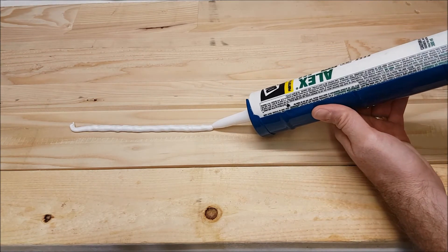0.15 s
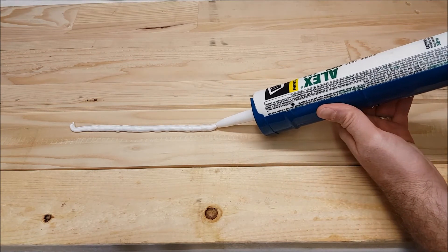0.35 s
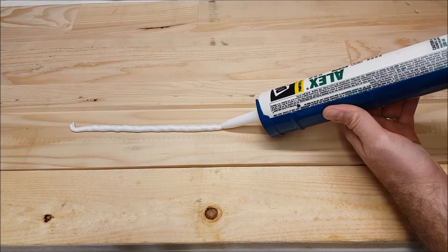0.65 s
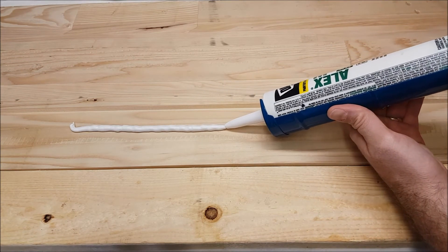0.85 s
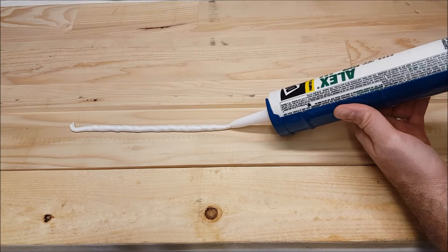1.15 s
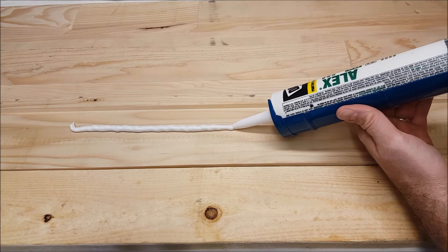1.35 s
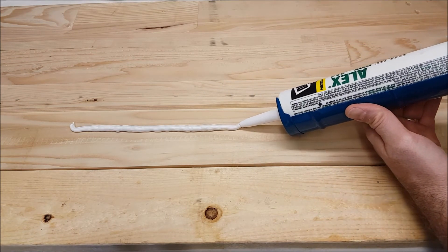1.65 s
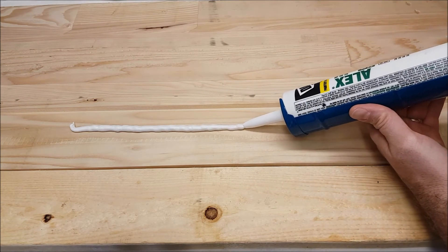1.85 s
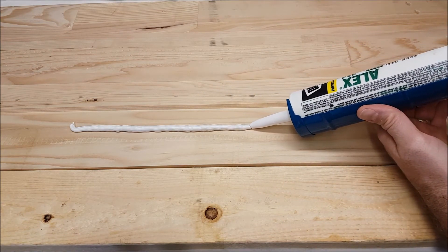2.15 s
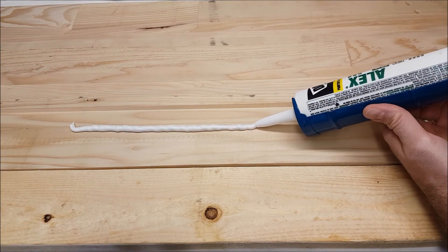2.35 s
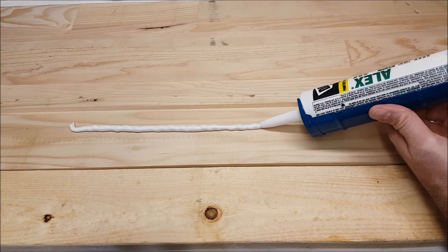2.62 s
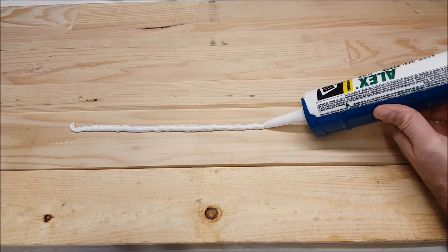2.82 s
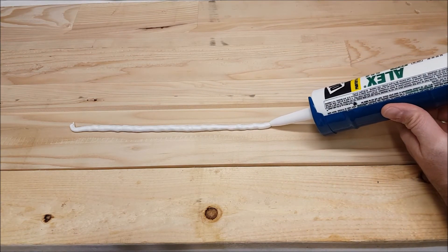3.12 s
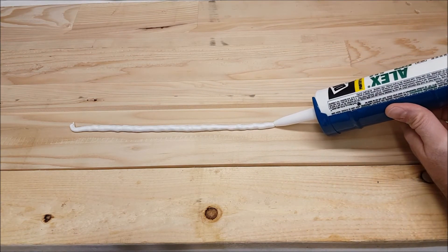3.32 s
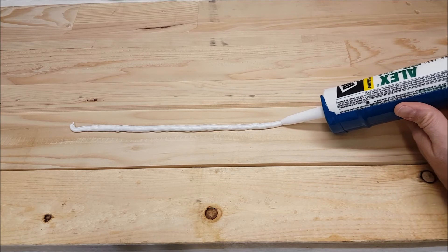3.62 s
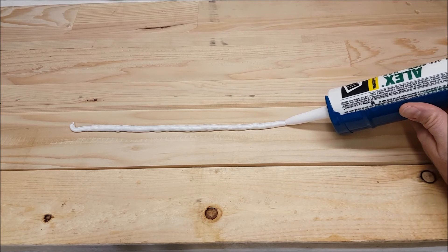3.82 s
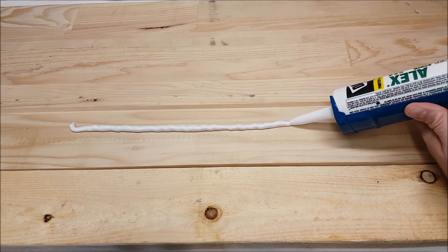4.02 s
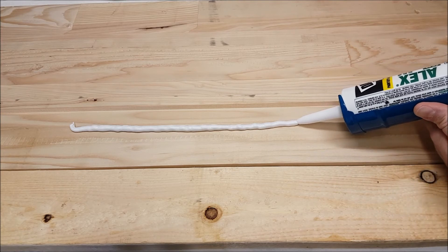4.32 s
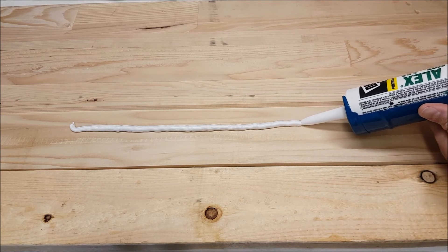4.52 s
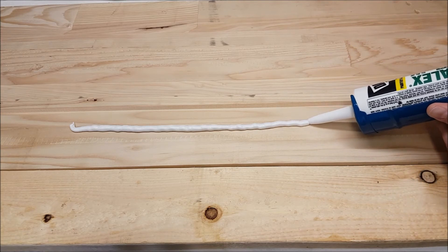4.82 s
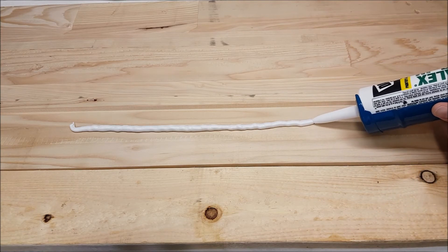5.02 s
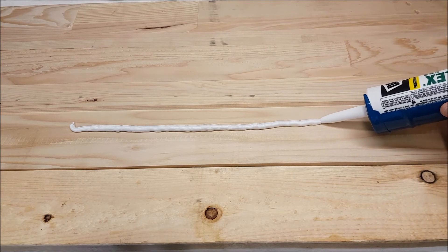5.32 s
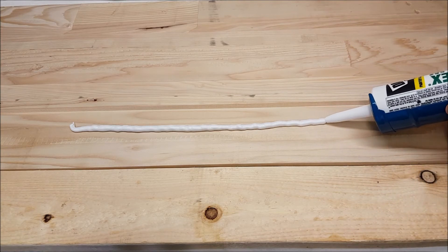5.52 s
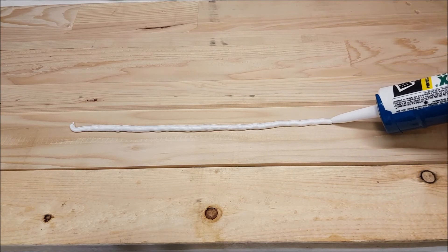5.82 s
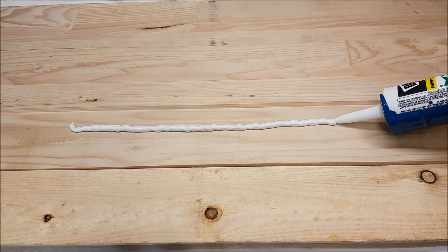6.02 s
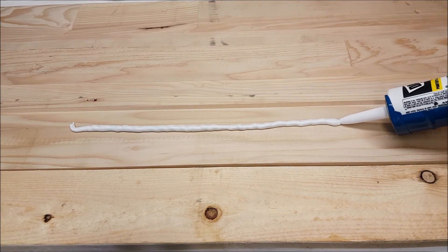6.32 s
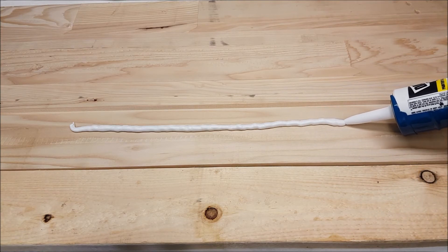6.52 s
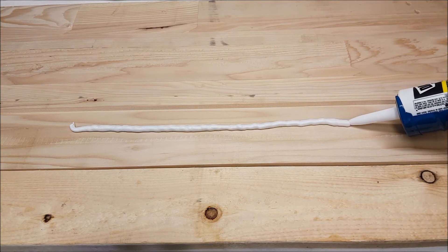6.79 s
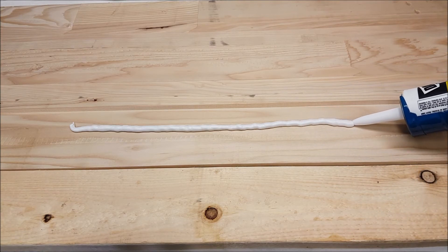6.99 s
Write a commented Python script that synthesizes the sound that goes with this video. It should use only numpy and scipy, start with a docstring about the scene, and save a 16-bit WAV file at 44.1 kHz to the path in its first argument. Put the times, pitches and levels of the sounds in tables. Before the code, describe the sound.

A battery caulking gun works close to the microphone in a small, dry workshop. Its grinding gears are already running, stop with a tick and snap, then after a pause of light clicks return in ten more short rasping bursts. Each has a faint whine, brush hiss and small surges. Late on, dull rubbing and soft bumps come very near the microphone. A low drone sinks beneath faint hum.

```python
"""A rasping grind is already running: a battery caulking gun lays a bead on a wooden bench in eleven pulls.
Tooth impacts and sliding flanks excite a resonant plastic housing; the mesh whines and the brushes hiss.
At each release of the trigger two noise bursts, shaped by resonance, make a tick and a snap.
Filtered noise rubs and damped bumps sound near the microphone; low hum tones swell and fade as sines,
and a far drone sinks in pitch."""
import sys
import numpy as np
from scipy import signal
from scipy.fft import rfft, irfft, next_fast_len
from scipy.io import wavfile
from scipy.ndimage import uniform_filter1d, map_coordinates

SR = 44100
rng = np.random.default_rng(int(sys.argv[2]) if len(sys.argv) > 2 else 0)


def materialize(psi):
    """Save the field psi as 16-bit PCM at rate SR to the path in sys.argv[1].

    A 1-D psi becomes a single channel; in a 2-D psi each row is a channel.
    """
    bounded = np.clip(np.atleast_2d(psi).T, -1, 1)
    quanta = np.round(bounded * 32767).astype(np.int16)
    wavfile.write(sys.argv[1], SR, quanta)


N = 315309

# Pulls of the trigger: press t/s, release t/s, snap delay t/s, relative grind level/dB,
# build-up time constant t/s, loaded tooth rate f/Hz, brush hiss level/dB relative to the load
PULLS = [(-0.03, 0.247, 0.0074, -44.5, 0.008, 729.6, -18),
         (1.129, 1.6364, 0.0059, -44, 0.037, 689.2, -19.5), (1.879, 2.3463, 0.0068, -44.5, 0.025, 609, -21),
         (2.616, 2.9426, 0.0045, -44.5, .028, 609.7, -19.5),
         (3.218, 3.5564, 0.0049, -43.7, 0.025, 654.7, -19),
         (3.891, 4.1929, 0.0062, -44, 0.016, 660.8, -20.5),
         (4.466, 4.7919, 0.0074, -44.5, 0.0099, 619, -19.5),
         (5.032, 5.4084, .0065, -43.5, 0.028, 594.3, -20), (5.703, 6.0014, 0.0062, -44, 0.016, 859.3, -17),
         (6.263, 6.5338, 0.0057, -44, 0.026, 782, -16), (6.803, 7.067, 0.0063, -44.5, 0.021, 767, -15)]


def amp(db):
    """Level definition: the amplitude ratio for a level in dB."""
    return 10 ** (np.asarray(db) / 20)


def unit(x):
    """Normalization: scale a signal to rms 1."""
    return x / np.sqrt(np.mean(x ** 2) + 1e-20)


def clock():
    """Uniform sampling: the time of every sample in seconds."""
    return np.arange(N) / SR


def along(points, hz):
    """Logarithmic frequency scale: interpolate (f/Hz, value) points."""
    f, v = np.transpose(points)
    return np.interp(np.log(hz + 1), np.log(f + 1), v)


def curves(rows):
    """Linear interpolation in time: one curve for each column after t/s."""
    s, *cols = np.transpose(rows)
    return [np.interp(clock(), s, c) for c in cols]


def wobble(rate):
    """Band-limited fluctuation: a spline through random knots, rate of them a second."""
    knots = rng.standard_normal(int(N * rate / SR) + 4)
    return map_coordinates(knots, [clock() * rate])


def swell(s, width):
    """Gaussian pulse: height 1 at time s, standard deviation width, both in seconds."""
    return np.exp(-.5 * ((clock() - s) / width) ** 2)


def filtered(x, response):
    """Linear filtering: the spectrum of x times a complex response of frequency."""
    m = 2 * next_fast_len(N // 2 + SR // 4)
    return irfft(rfft(x, m) * response(np.fft.rfftfreq(m, 1 / SR)), m)[:N]


def body(points):
    """Minimum phase: a folded cepstrum makes the causal response of a (f/Hz, level/dB) spectrum."""
    def response(hz):
        cepstrum = irfft(np.log(amp(along(points, hz))))
        cepstrum[1:len(hz) - 1] *= 2
        cepstrum[len(hz):] = 0
        return np.exp(rfft(cepstrum))
    return response


def ringing(modes, f):
    """Modal superposition: (f/Hz, width f/Hz, level/dB) resonances added to a flat response."""
    return 1 + sum(amp(db) * 1j * f * w / (c * c - f * f + 1j * f * w) for c, w, db in modes)


def noise(points):
    """Spectral shaping: white noise given a (f/Hz, level/dB) spectrum and rms 1."""
    return unit(filtered(rng.standard_normal(N), lambda hz: amp(along(points, hz))))


def add(track, s, sound):
    """Superposition: mix a short sound into the track at time s."""
    part = track[max(round(s * SR), 0):][:len(sound)]
    part += sound[:len(part)]


def crack(t60):
    """Contact impulse: a noise burst that decays by 60 dB in t60 seconds."""
    t = np.arange(SR // 10) / SR
    return rng.standard_normal(len(t)) * amp(-60 * t / t60)


def workshop(air_db=-60):
    """Ambient field: room air, low hum tones that swell and fade, and a far machine whose pitch falls."""
    # Far machine running down: t/s, mean level/dB
    drone_levels = [(0, -45.5), (.5, -55.5), (2.8, -56), (3.5, -66), (5.2, -56.5), (7.15, -58)]
    # Hum of the room: t/s, 60 Hz mains level/dB, 101 Hz tone level/dB
    hum_levels = [(0, -57.5, -83), (5.5, -64.5, -65), (6.1, -56, -57), (7.15, -63, -60.5)]
    # Spectrum of the room air: f/Hz, relative level/dB per Hz
    air_spectrum = [(12, -59.5), (20, -17), (32, -8), (81, -11), (98, -14), (116, -16.5), (255, -23.5),
                    (485, -28.5), (558, -30), (607, -26.5), (698, -33.5), (949, -29), (1090, -33.5),
                    (16000, -55.5)]
    drone_start_hz, drone_end_hz, sink_s = 90, 70.3, 2.2

    drone_hz = drone_end_hz + (drone_start_hz - drone_end_hz) * np.exp(-clock() / sink_s)
    drone_hz = drone_hz + 3 * wobble(12)
    drone_db, = curves(drone_levels)
    drone = amp(drone_db + 1.6 * wobble(25)) * np.sin(2 * np.pi * np.cumsum(drone_hz) / SR)

    mains_db, tone_db = curves(hum_levels)
    mains = amp(mains_db) * np.sin(2 * np.pi * 60 * clock())
    tone = amp(tone_db) * np.sin(2 * np.pi * 101 * clock() + 0.57 * wobble(6.3))
    air = amp(air_db + 0.79 * wobble(0.94)) * noise(air_spectrum)
    return air + drone + mains + tone


def pressure():
    """Energy addition: the level in dB of overlapping strokes that rise, hold and decay."""
    # Strokes of rubbing near the microphone: start t/s, end t/s, relative level/dB
    rub_strokes = [(5.251, 5.368, -40.5), (5.34, 5.505, -39.5), (5.547, 5.63, -52), (6.05, 6.385, -52.5),
                   (6.118, 6.22, -52.5), (6.551, 7.15, -57.5)]
    attack_s, decay_s = 0.012, 0.024
    t = clock()
    strokes = []
    for start, end, db in rub_strokes:
        rise = np.clip((t - start) / attack_s, 0, 1)
        decay = np.exp(-np.maximum(t - end, 0) / decay_s)
        strokes.append(amp(db) * rise * decay)
    return 10 * np.log10(np.sum(np.square(strokes), axis=0) + 1e-20)


def handling(rub_db=-3, throb_db=-4, bump_db=3):
    """Sliding friction and soft impact: a dull rub with crackle and throb, and damped bumps."""
    # Spectrum of the rub: f/Hz, relative level/dB per Hz
    rub_spectrum = [(15, -58.5), (25, -30), (43, -9), (64, -7), (92, -4.5), (151, -4.5), (357, -18.5),
                    (446, -16), (767, -28), (1290, -24.5), (9000, -53), (11700, -79.5), (19800, -120)]
    # Spectrum of the small slips within the rub: f/Hz, relative level/dB per Hz
    crackle_spectrum = [(150, -14), (450, 0), (1300, -6), (3000, -17), (8000, -32), (14000, -52)]
    # Spectrum of the low throb of the rub: f/Hz, relative level/dB per Hz
    throb_spectrum = [(15, -8), (28, -10), (45, -10), (58, 2.5), (80, -10), (130, -12), (200, -26),
                      (400, -26), (1500, -100)]
    # Soft bumps of the hand on the tube and bench: t/s, relative peak level/dB, band centre f/Hz
    hand_bumps = [(1.96, -41.5, 593), (5.265, -38.5, 421.5), (5.378, -41.5, 476), (5.57, -41.5, 260),
                  (6.335, -50.5, 249.8), (6.577, -46.5, 228.4), (6.919, -41.5, 205)]
    grain_db, spike_db, crackle_db = 1.8, 5, -9
    firm_db, bump_t60 = -39, .08  # dB, s

    press_db = pressure()
    rub = unit(noise(rub_spectrum) * amp(grain_db * wobble(150)))
    slips = unit(noise(crackle_spectrum) * amp(spike_db * np.minimum(wobble(260), 2)))
    sound = amp(press_db + rub_db) * (rub + amp(crackle_db) * slips)

    # the bass throb grows faster than the rub as contact firms
    firm_press_db = press_db + .5 * (press_db - firm_db)
    sound += amp(firm_press_db + throb_db) * noise(throb_spectrum)

    for s, db, hz in hand_bumps:
        band = signal.butter(2, [hz - 120, hz + 120], "band", fs=SR)
        thud = signal.lfilter(*band, crack(bump_t60))
        add(sound, s, amp(db + bump_db) * thud / np.abs(thud).max())
    return sound


def walls(x, delay=.003):
    """Reverberation: convolve with decaying noise; the moving gun meets new reflections at each pull."""
    # Decay of the small room: f/Hz, 60 dB decay t/s
    decay_times = [(150, 0.11), (1500, 0.21), (5000, 0.13), (10000, 0.22), (16000, 0.081)]
    room = np.zeros(N)
    edges = [round(pull[0] * SR) for pull in PULLS[1:]]
    for start, part in zip([0] + edges, np.split(x, edges)):
        hz, t, z = signal.stft(rng.standard_normal(SR // 3), SR, nperseg=256)
        decay = amp(-60 * t / along(decay_times, hz)[:, None])
        tail = signal.istft(z * decay, SR, nperseg=256)[1]
        answer = signal.fftconvolve(part, tail / np.linalg.norm(tail))
        add(room, start / SR + delay, answer)
    return room


def passing(x):
    """Changing transfer path: the gun's colour crossfades as it is drawn along the bead past the microphone."""
    # Change of colour from the start of the bead to its end: f/Hz, level/dB
    colour_change = [(500, 1), (1000, 0.5), (1700, 0), (2200, 2.5), (2600, -3), (3200, 1.5), (3700, 0),
                     (5000, 3), (7500, 1), (10800, -4.5), (15000, -1)]
    progress = clock() * SR / N
    first = filtered(x, lambda hz: amp(-.5 * along(colour_change, hz)))
    last = filtered(x, lambda hz: amp(.5 * along(colour_change, hz)))
    return (1 - progress) * first + progress * last


def housing(force):
    """Forced vibration: the plastic shell gives a broad response lifted by a few ringing modes."""
    # Broad response of the shell: f/Hz, relative level/dB per Hz
    shell_spectrum = [(250, -28), (420, -14), (560, -6), (900, -4.5), (1300, -4.5), (1600, 0.5), (2000, -1),
                      (2400, 4.5), (2850, 2), (3300, 4.5), (3900, -6), (4800, -17), (6000, -32.5),
                      (15000, -38.5)]
    # Resonances standing out of it: f/Hz, width f/Hz, level/dB relative to the broad response
    shell_modes = [(1635, 90, 3), (2490, 200, -2), (3290, 140, -5), (3620, 100, -3), (4260, 90, -4)]
    return filtered(force, lambda f: body(shell_spectrum)(f) * ringing(shell_modes, f))


def switch(tick_t60=0.022, snap_t60=0.017, tick_db=-29.0, snap_db=-29.0, press_db=-43,
           light_db=-37, light_knock_db=-44, touch_db=5, soft_hz=8000, spring_hz=10400, spring_db=-1):
    """Impact excitation: contacts tick and snap through a body; returns them and the resonant spring ping."""
    # Body of the switch: f/Hz, relative level/dB per Hz
    switch_spectrum = [(300, -13), (620, -12), (790, 2), (1350, -5), (1600, 1.5), (2600, -0.5),
                       (3800, -3.5), (4600, -1), (5700, -6), (8300, -5.5), (10700, -5), (11600, -12.5),
                       (15500, -13.5)]
    # One pull too light to start the motor: press t/s, release t/s, snap delay t/s
    light_pull = (0.4567, 0.98, 0.0038)
    # Small ticks and knocks of the gun, some as the trigger is pressed:
    # t/s, relative tick level/dB, relative level/dB of the knock in the housing
    small_ticks = [(0.619, -60.5, -66), (.964, -61, -50), (1.129, -62, -37.5), (1.145, -54, -66),
                   (3.862, -68, -59), (3.8958, -52, -39.5), (5.064, -48, -37), (5.376, -42, -62),
                   (5.572, -55.5, -51), (5.631, -57, -61), (6.149, -49.5, -61), (6.3024, -46, -50)]
    touch_t60, knock_t60 = .017, .052  # s

    soft, sharp, knocks = np.zeros((3, N))
    for _, release, delay, *_ in [light_pull, *PULLS]:
        add(soft, release, amp(tick_db) * crack(tick_t60))
        add(sharp, release + delay, amp(snap_db) * crack(snap_t60))
    # only the release snaps, placed so far, excite the spring
    spring = amp(spring_db) * signal.lfilter(*signal.iirpeak(spring_hz, 8, SR), sharp)

    for press, *_ in PULLS:
        if press > 0:
            add(sharp, press, amp(press_db) * crack(touch_t60))
    add(sharp, light_pull[0], amp(light_db) * crack(touch_t60))
    add(knocks, light_pull[0], amp(light_knock_db) * crack(knock_t60))
    for s, db, shell_db in small_ticks:
        add(sharp, s, amp(db + touch_db) * crack(touch_t60))
        add(knocks, s, amp(shell_db) * crack(knock_t60))

    soft = filtered(soft, lambda hz: 1 / (1 + 1j * hz / soft_hz))
    clicks = filtered(sharp + soft, body(switch_spectrum)) + housing(knocks)
    return clicks, filtered(spring, body(switch_spectrum))


def drive(onset_power=1.34, drift_db=.4, drift=.05):
    """Motor under load: the grind builds, the tooth rate sags; returns load gain, tooth rate, hiss in dB."""
    # The load eases and the grinding drops: t/s, level change/dB
    load_slacks = [(0.154, -4), (1.483, -5.5), (2.049, -10)]
    slack_width_s = 0.012  # standard deviation of such a drop
    # the mesh starts fast and sags as the plunger takes up the load
    free_tooth_hz, sag_s = 861, .06
    # the power cuts just before the switch clicks; the gears stop almost at once
    cut_lead_s, coast_s = 0.016, 0.0065

    t = clock()
    load, brush_db = np.zeros((2, N))
    tooth_hz = np.full(N, float(free_tooth_hz))
    for press, release, _, db, build_up_s, loaded_hz, hiss_db in PULLS:
        on = t >= press
        age = t[on] - press
        onset = (1 - np.exp(-age / build_up_s)) ** onset_power
        coast = np.exp(-np.maximum(t[on] - release + cut_lead_s, 0) / coast_s)
        load[on] = amp(db) * onset * coast
        tooth_hz[on] = loaded_hz + (free_tooth_hz - loaded_hz) * np.exp(-age / sag_s)
        brush_db[on] = hiss_db
    slack_db = sum(db * swell(s, slack_width_s) for s, db in load_slacks)
    load = load * amp(slack_db + drift_db * wobble(25))
    return load, tooth_hz * np.exp(drift * wobble(16)), brush_db


def catching():
    """Periodic binding: the gain of brief surges where a tight spot catches the gears once a turn."""
    # Runs of catches: first catch t/s, turn t/s, catches in a row, lift level/dB
    tight_spots = [(0.055, .064, 3, 4.8), (1.356, .062, 2, 3.6), (1.556, .06, 1, 4.8), (1.976, .06, 1, 4.5),
                   (2.192, .056, 3, 3.6), (2.678, .08, 2, 7.6), (3.273, .064, 3, 7), (4.025, .059, 2, 6.6),
                   (4.643, .07, 2, 5.6), (5.154, .066, 3, 6.4), (5.742, .056, 4, 4.8),
                   (6.318, .055, 3, 6.8), (6.859, .05, 2, 4.4)]
    width_s = .005
    lift_db = np.zeros(N)
    for first, turn, count, db in tight_spots:
        for k in range(round(count)):
            lift_db += db * swell(first + k * turn, width_s)
    return amp(lift_db)


def shifting(x):
    """Position-dependent modal excitation: as the contact point wanders, each band swells and fades."""
    depth_db = 1.6
    z = signal.stft(x, nperseg=512)[2]
    field = uniform_filter1d(rng.standard_normal(z.shape), size=5, axis=0)
    field = uniform_filter1d(field, size=4, axis=1)
    return signal.istft(z * amp(depth_db * unit(field)), nperseg=512)[1][:N]


def squeaks(width=0.026, squeak_db=1):
    """Friction-excited vibration: short, unsteady tones near the lowest housing mode."""
    # Squeaks: t/s, f/Hz, relative level/dB
    friction_tones = [(1.42, 1647, -53), (1.56, 1636, -50), (1.975, 1625, -47), (2.68, 1663, -53),
                      (4.765, 1663, -50), (5.91, 1577, -53), (6.94, 1695, -49)]
    t = clock()
    waver = .5 * wobble(120)  # phase in radians, common to all
    sound = np.zeros(N)
    for s, hz, db in friction_tones:
        sound += amp(db) * swell(s, width) * np.sin(2 * np.pi * hz * t + waver)
    return amp(squeak_db) * sound


def gears(grind_db=-1, whine_db=-17.5, loaded_hz=620, strain_db=-22, hiss_db=0, stray_db=3):
    """Gear-mesh excitation: uneven impacts and sliding drive the housing; the mesh whines, the brushes hiss."""
    # Spectrum of the brush hiss: f/Hz, relative level/dB per Hz
    brush_spectrum = [(3000, -26), (4700, 0), (6300, -1), (7500, -4.5), (9000, -9.5), (12000, -17),
                      (16000, -31)]
    # Motor can ringing in the hiss: f/Hz, width f/Hz, level/dB relative to the unringing hiss
    can_modes = [(6330, 160, -4), (7340, 260, 3), (8550, 110, 2), (11450, 200, -3)]
    slip, backlash_s, scatter_db = .04, .0002, 3.5

    load, tooth_hz, brush_db = drive()
    teeth = np.cumsum(tooth_hz * (1 + slip * wobble(120))) / SR
    hits = np.flatnonzero(np.diff(np.floor(teeth)))
    # backlash lands each tooth early or late, so the overtones melt into a rasp
    early, size = np.clip(rng.standard_normal((2, N))[:, hits], -2, 2)
    landed = np.clip(hits + backlash_s * SR * early, 0, N - 1).astype(int)
    impacts = np.bincount(landed, amp(scatter_db * size), N)
    # the flanks slide hardest just after each tooth's nominal contact
    sliding = rng.standard_normal(N) * np.exp(-(teeth % 1))
    force = unit(impacts - impacts.mean()) + unit(sliding)
    force = force / housing(force).std()
    flutter = amp(1.2 * wobble(160))
    grind = shifting(housing(load * catching() * flutter * force))

    # the smeared mesh tone comes and goes; it grows as the load slows the motor
    play = (wobble(110) + 1j * wobble(110)) * amp(stray_db * wobble(35))
    mesh_tone = unit(np.real(play * np.exp(2j * np.pi * teeth)))
    whine = amp(whine_db + strain_db * np.log2(tooth_hz / loaded_hz)) * mesh_tone

    uneven_hiss = noise(brush_spectrum) * amp(1.8 * wobble(500))
    hiss = unit(filtered(uneven_hiss, lambda f: ringing(can_modes, f)))
    hiss = amp(brush_db + hiss_db) * hiss
    return amp(grind_db) * grind + load * (whine + hiss) + squeaks()


def scene(motor_room_db=-10, switch_room_db=-8, absorb_hz=13000):
    """Direct and reverberant fields: the gun close by and its room answer, with handling and ambience."""
    motor = gears()
    clicks, ping = switch()
    # the tiny spring carries only at close range, so its ping excites no reverberation
    room = walls(amp(motor_room_db) * motor + amp(switch_room_db) * clicks)
    room = filtered(room, lambda hz: 1 / (1 + 1j * hz / absorb_hz))
    gun = passing(motor + clicks + ping + room)
    return (gun + handling() + workshop())[None]


def record(dry):
    """Band limitation: nothing is kept from the top frequency upward."""
    top_hz = 16100
    return filtered(dry[0], lambda hz: hz < top_hz)[None]


dry = scene()
out = record(dry)
materialize(out)
```